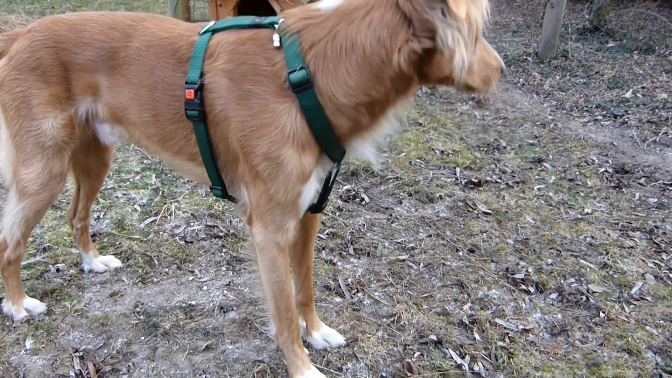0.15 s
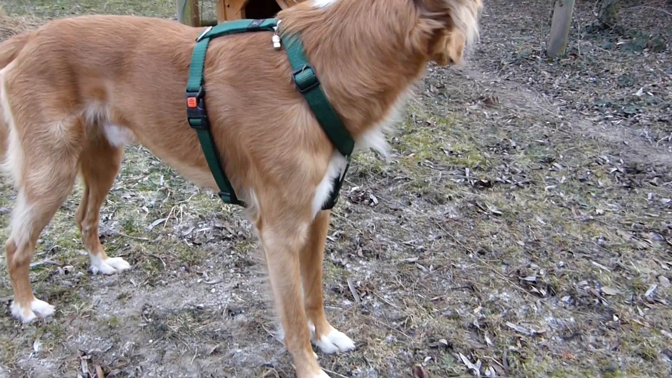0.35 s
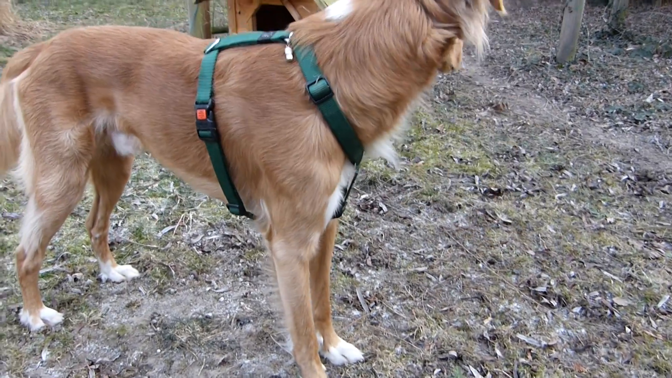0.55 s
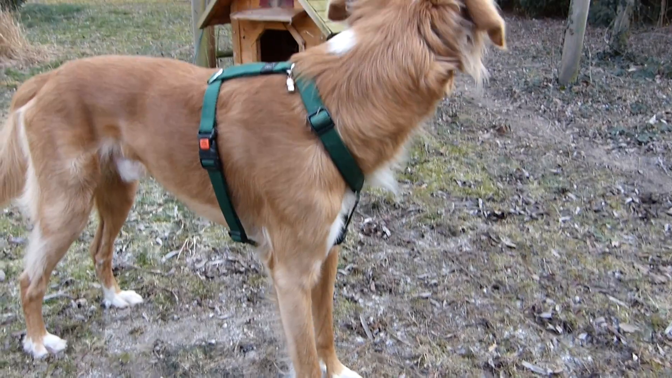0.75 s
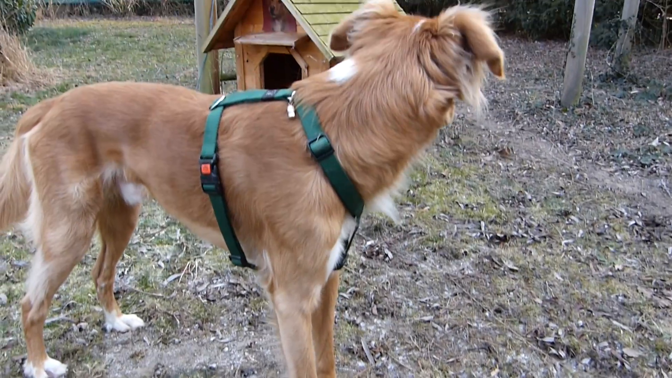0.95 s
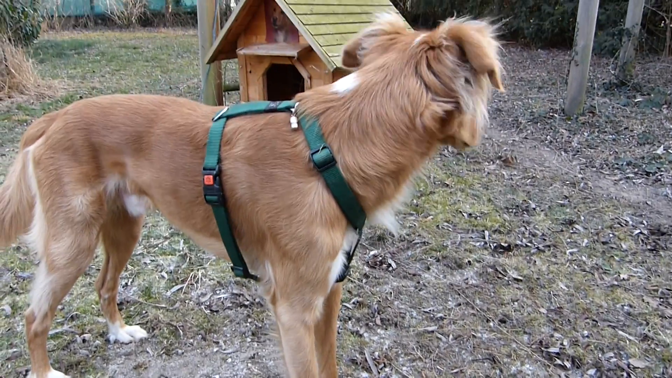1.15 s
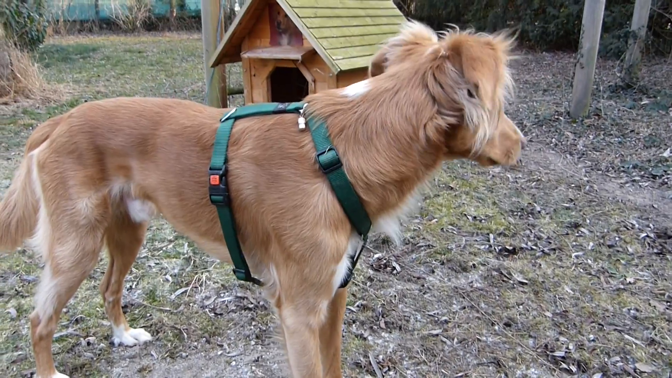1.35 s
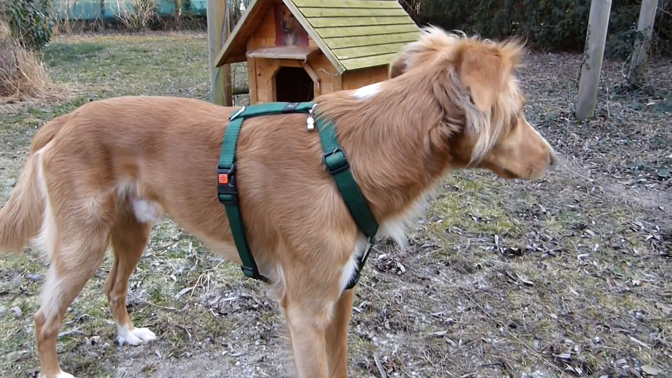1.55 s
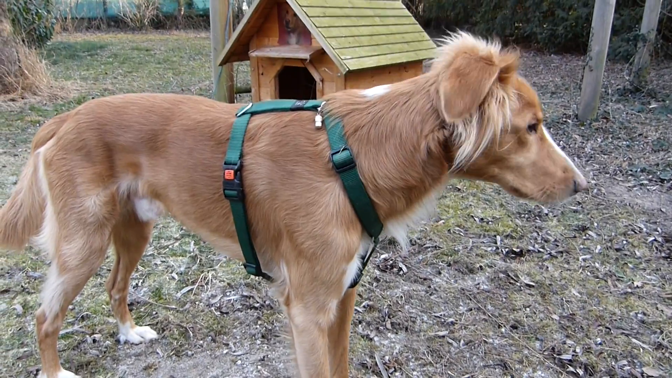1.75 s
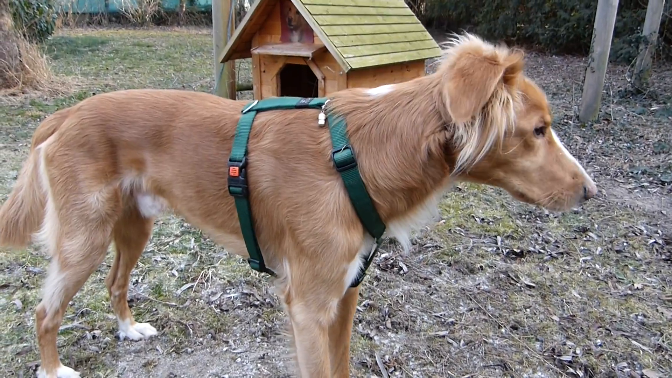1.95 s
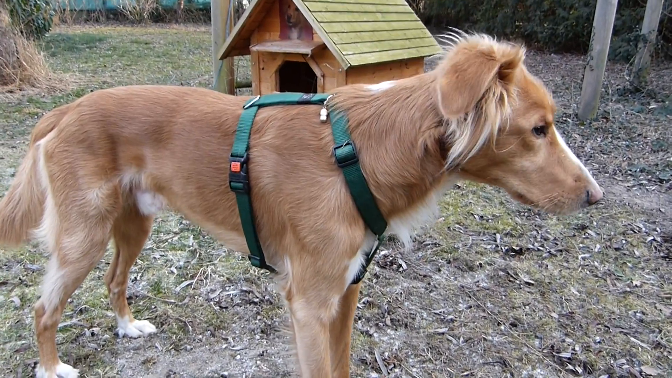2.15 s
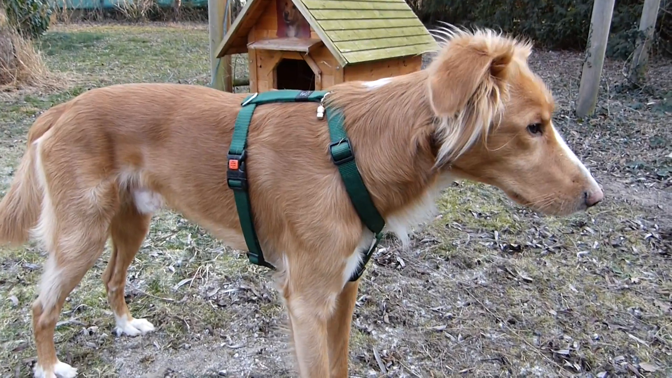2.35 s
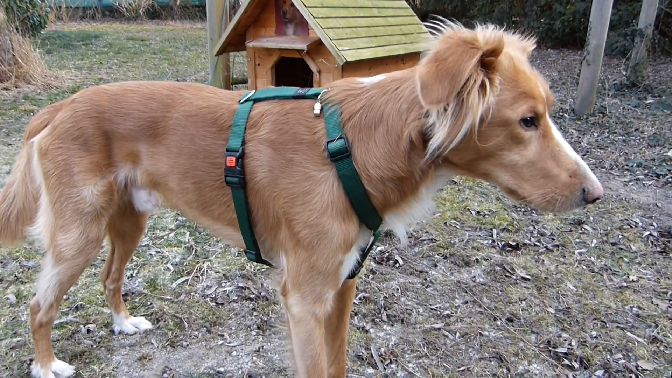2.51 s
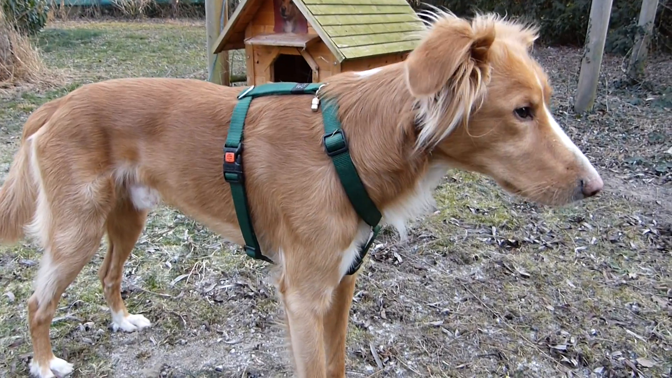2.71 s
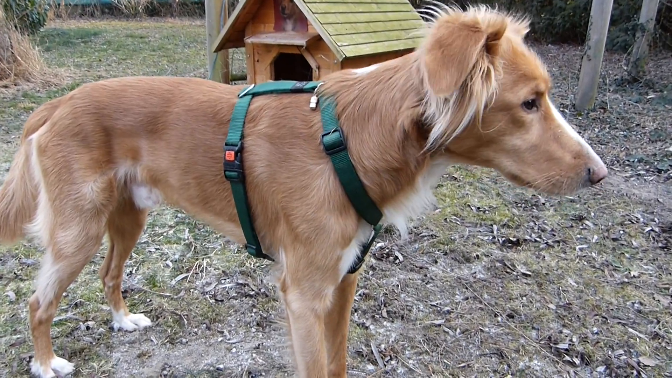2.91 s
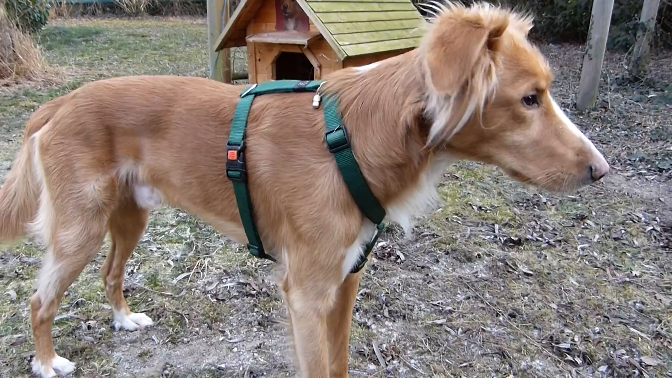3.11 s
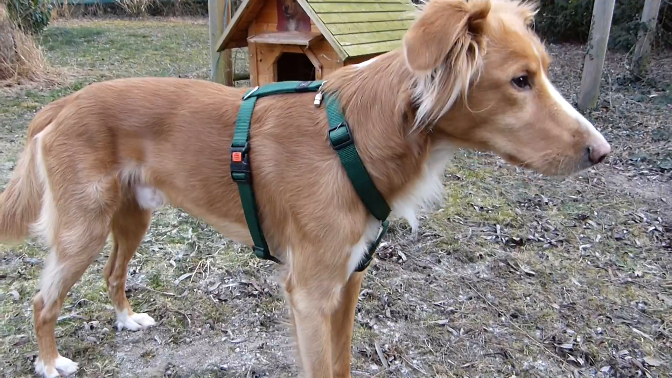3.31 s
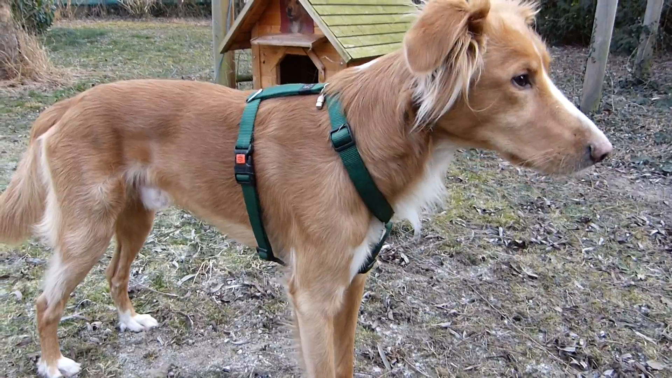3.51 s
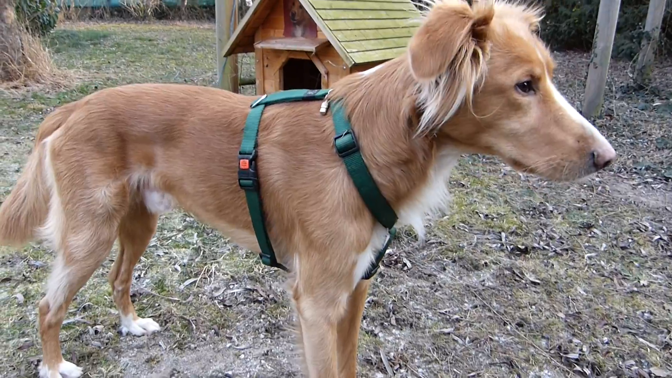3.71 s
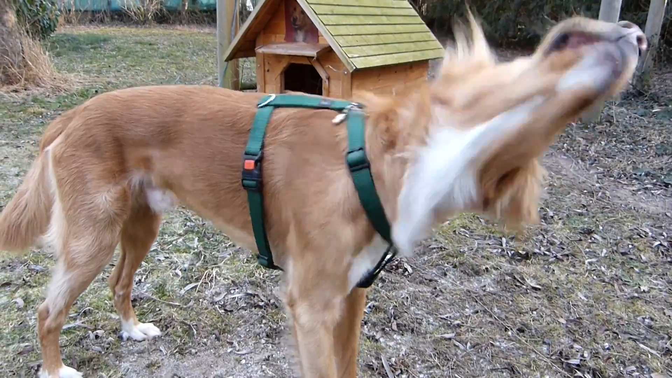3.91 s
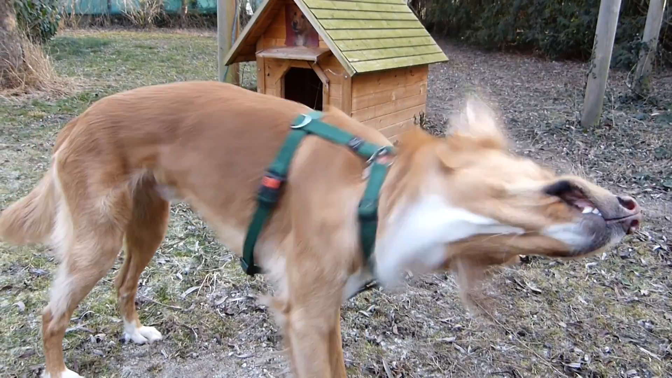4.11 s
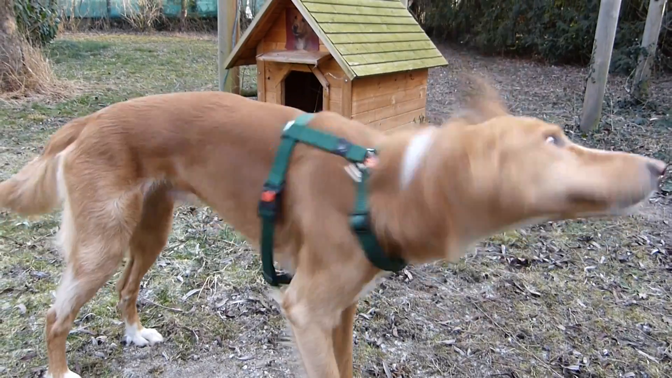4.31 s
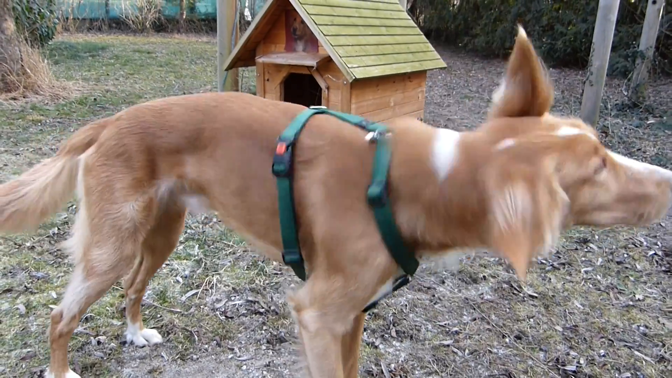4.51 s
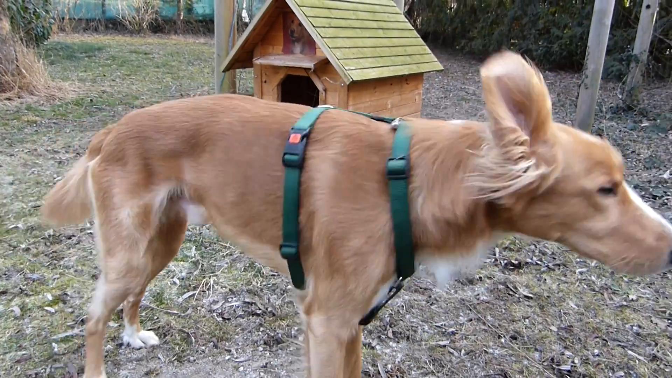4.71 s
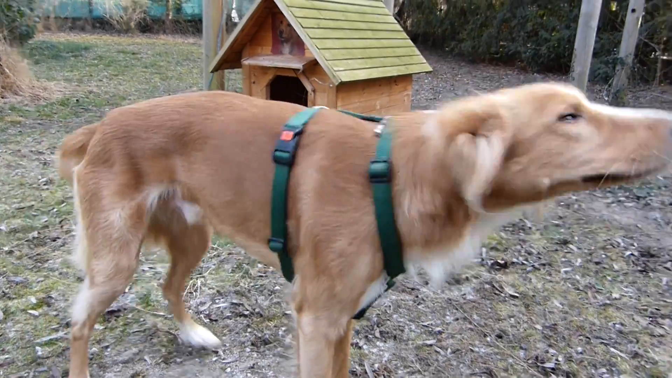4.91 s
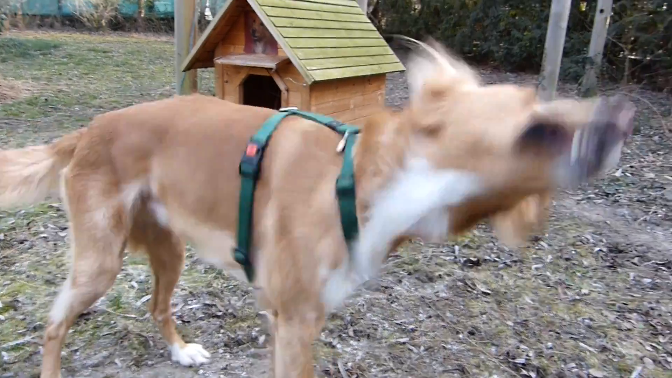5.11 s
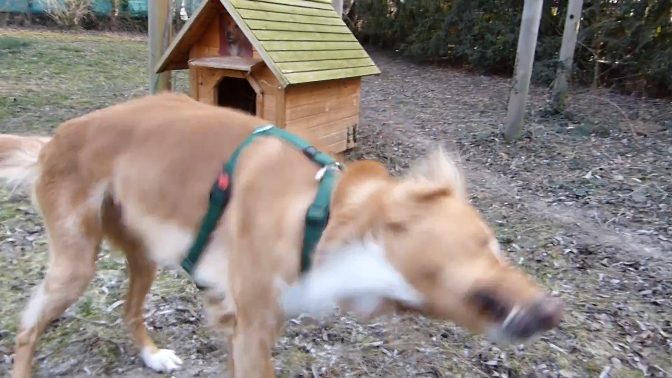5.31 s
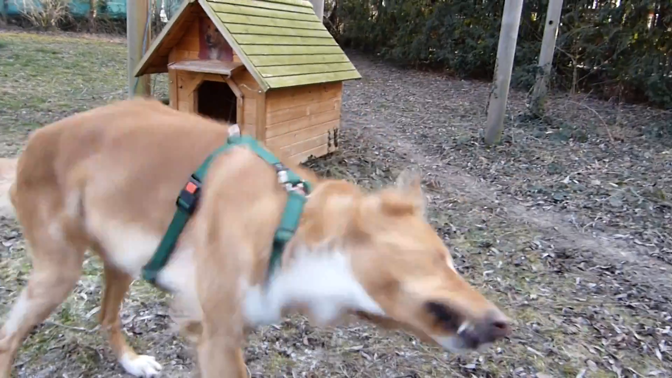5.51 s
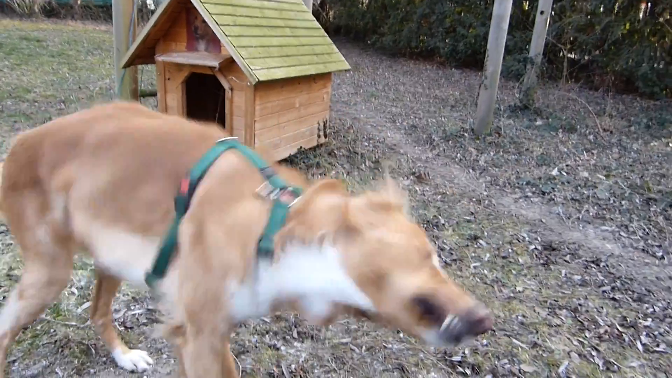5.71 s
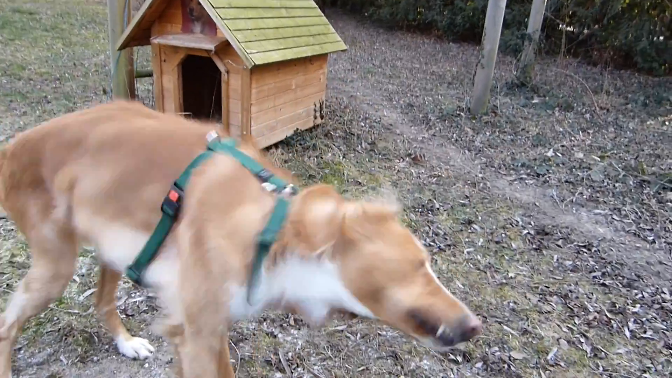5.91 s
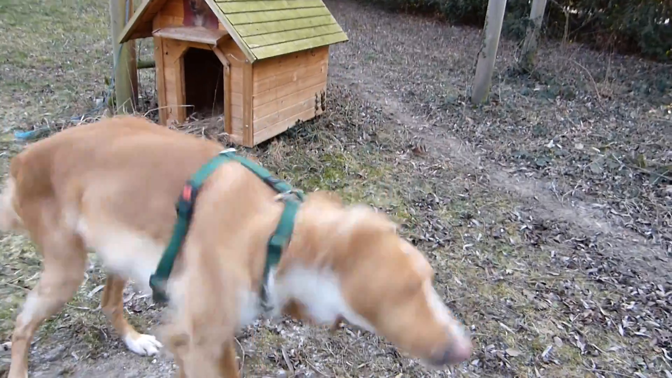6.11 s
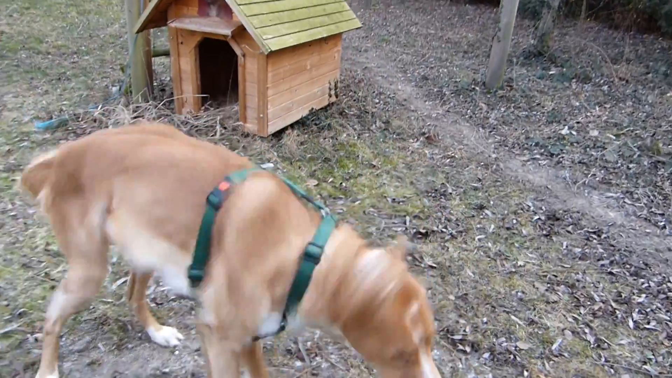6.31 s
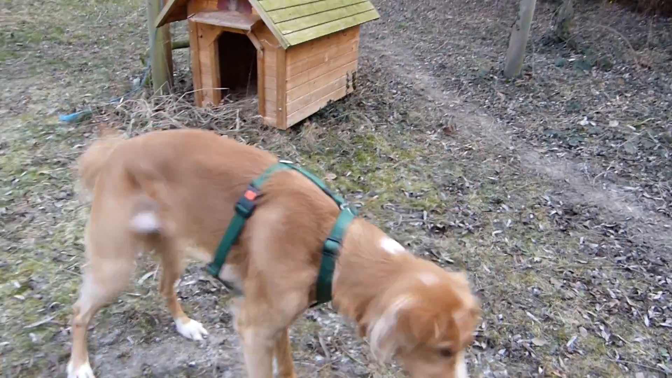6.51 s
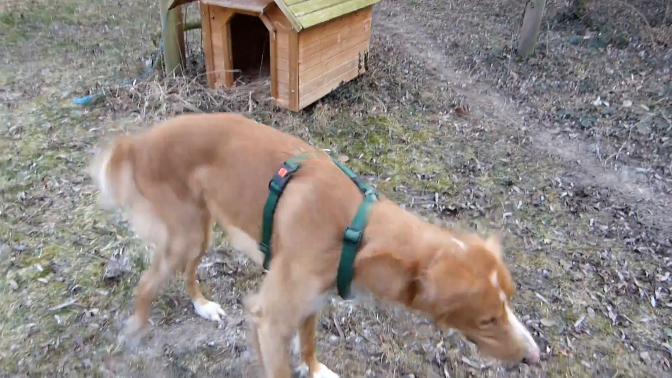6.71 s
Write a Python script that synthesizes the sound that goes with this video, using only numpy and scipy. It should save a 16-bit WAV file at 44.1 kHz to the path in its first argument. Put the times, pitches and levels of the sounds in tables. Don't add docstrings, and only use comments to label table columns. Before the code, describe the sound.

Quiet leaf scuffs and distant traffic, then a close dog's head and body shake with flapping ears, clinking harness metal and snapping twigs.

```python
import sys
import numpy as np
from scipy import signal
from scipy.fft import rfft, irfft, next_fast_len
from scipy.io import wavfile
from scipy.ndimage import uniform_filter1d

SR = 44100
rng = np.random.default_rng(int(sys.argv[2]) if len(sys.argv) > 2 else 0)


def makeup_ratio(level_db):
    decades = np.asarray(level_db, float) / 20
    return 10 ** decades


def persist_wave(psi):
    counts = np.round(np.clip(psi, -1, 1) * 32767).astype(np.int16)
    wavfile.write(sys.argv[1], SR, np.atleast_2d(counts).T)


N = 297807

# frequency in Hz, density in dB per Hz.
AIR_SPECTRUM = [(15, -39), (25, -21), (60, -12.5), (208, -3), (304, -5), (422, 1.5), (538, -0.5), (787, 4),
                (1510, -2.5), (3510, -16.5), (4130, -11.5), (7920, -13), (11000, -22), (13000, -26),
                (15600, -27), (16500, -36)]
# time in seconds, level in dB.
AIR_SWELL = [(0, 4), (2.2, 2.5), (2.6, 1), (3.4, 1.5), (3.8, 3.5), (6.75, -0.5)]
# frequency in Hz, correlation from -1 to 1.
AIR_SAME = [(60, 0.71), (150, 0.65), (380, -0.49), (950, 0.069), (2380, 0.019), (5980, 0.7), (15000, 0.37)]
# start, loudest and end in seconds, hiss in dB, brightest frequency in Hz.
SCUFFS = [(0.206, 0.273, .36, -51, 2600), (0.62, 0.84, .93, -50.5, 7400), (0.926, 0.968, 1.05, -47, 1890),
          (1.07, 1.07, 1.1, -55, 4520), (1.23, 1.276, 1.3, -56.5, 5500), (1.311, 1.333, 1.362, -44.5, 3720),
          (1.513, 1.52, 1.55, -58, 2530), (1.592, 1.7, 1.79, -45, 6850), (1.824, 1.852, 1.91, -44, 2900),
          (1.897, 1.937, 1.97, -56.5, 6000), (2.028, 2.079, 2.15, -43.5, 5100),
          (2.124, 2.177, 2.225, -45.5, 5400), (3.45, 3.56, 3.68, -61.5, 6500)]
# frequency in Hz, density in dB per Hz.
LEAF_SPECTRUM = [(180, -11), (300, -8.5), (392, -43), (462, -18), (584, -28), (762, -4), (1360, -14.5),
                 (1530, -23), (1840, -13), (3890, -14), (7080, -11), (9000, -20), (16000, -46.5)]
# frequency in Hz, correlation.
LEAF_SAME = [(200, 0.51), (700, 0.62), (2000, 0.21), (5000, 0.23), (15000, 0.13)]
# start, loudest and end in seconds, level in dB.
DRAGS = [(.215, .275, 0.32, -40.5), (.65, .8, 0.93, -46.5), (0.867, 0.894, 0.9, -41),
         (0.926, 1.005, 1.037, -37.5), (1.06, 1.073, 1.1, -48), (1.232, 1.275, 1.27, -43),
         (1.311, 1.326, 1.38, -37.5), (1.4, 1.433, 1.46, -49), (1.516, 1.526, 1.57, -48),
         (1.587, 1.67, 1.79, -39), (1.807, 1.857, 1.93, -39), (1.91, 1.946, 1.97, -51),
         (2.03, 2.083, 2.07, -40), (2.13, 2.195, 2.29, -42), (3.15, 3.2, 3.2, -55), (3.45, 3.57, 3.7, -56),
         (3.8, 3.93, 5.6, -58)]
# frequency in Hz, density in dB per Hz.
DRAG_SPECTRUM = [(60, -40), (100, -34), (250, 3), (560, 7.5), (790, -8), (1100, 4), (1600, -29),
                 (3000, -52)]
# start in
# seconds, tick in dB, struck ring in dB, jostled rings in dB, letters of the ring struck and then those
CLACKS = [(1.0659, -53, -45, -57, "abc"), (2.1862, -49, -43, -39, "bc"), (3.8918, -51.5, -41, -48, "ab"),
          (3.9953, -56, -43, -47, "cdb"), (4.055, -41, -48, -50, "ba"), (4.1146, -45, -25, -47, "cba"),
          (4.1346, -44, -16.5, -39, "dac"), (4.4938, -47, -23, -28, "ad"), (4.577, -52, -33, -37, "cd"),
          (4.824, -53.5, -46, -55, "bda"), (4.903, -55, -56, -60, "ab"), (5.1964, -46, -43, -43, "bc"),
          (5.2807, -50, -25, -46, "bac"), (5.392, -36, -14, -24, "cda"), (5.5451, -45, -19, -36, "cd"),
          (5.5781, -38, -13, -32, "da"), (5.6102, -29, -24, -27, "bac"), (5.6427, -38, -13, -20, "cda"),
          (5.7143, -55, -21, -22, "cd"), (5.7269, -23.5, -5, -13, "db"), (5.726, -41, -9, -15, "bd"),
               (5.7675, -43, -19, -20, "cd"), (5.847, -59, -23, -23, "ad"), (6.002, -48, 0.5, -22, "cda"),
               (6.021, -38, -17, -30, "abc"), (6.205, -47, -31, -35, "adc"),
               (6.2282, -43, -15.5, -18, "dc"), (6.3485, -36, -11.5, -22, "adc"),
               (6.402, -42, -11, -32, "cabd"), (6.408, -44, -21, -34, "dab")]
# start in seconds, tick in dB, struck ring in
# dB, jostled rings in dB, letters of the ring struck and then those jostled.
KNOCKS = [(4.1668, -46, -18, -25, "cda"), (4.203, -48, -32, -36, "dc"), (4.2115, -50, -26, -27, "dc"),
          (4.217, -52, -27, -32, "ad"), (4.2324, -56, -26, -38, "ad"), (4.398, -55, -35, -46, "cd"),
          (4.414, -55, -37, -36, "ca"), (4.434, -46, -27, -21, "adc"), (4.446, -53, -35, -31, "adc"),
          (4.464, -59, -35, -50, "ad"), (4.4297, -56, -22, -24, "cda"), (4.451, -47, -26, -36, "adc"),
          (5.162, -49, -39, -45, "ac"), (5.171, -55, -34, -30, "ac"), (5.209, -55, -37, -39, "ac"),
          (5.229, -59, -34, -34, "ca"), (5.265, -45, -31, -33, "dab"), (5.276, -55, -30, -49, "bc"),
          (5.4868, -42, -25, -27, "cd"), (5.5661, -51, -23, -23, "acd"), (5.5724, -26, -11.5, -15.5, "adc"),
          (5.5893, -30, -8.5, -18, "ad"), (5.5956, -35, -16, -26, "dac"), (5.6008, -33, -7.5, -13, "bc"),
          (5.606, -39, -13, -18, "bcd"), (5.622, -57, -16.5, -25, "da"), (5.6533, -36.5, -18, -20, "cd"),
          (5.664, -43, -24, -46, "dc"),
          (5.798, -50, -29, -45, "ac"), (5.8054, -36, -13, -17.5, "cda"),
               (5.8118, -30, -12.5, -28, "bac"), (5.866, -42, -22.5, -30, "dab"),
               (5.8853, -55, -26, -25, "dc"), (5.903, -49, -21, -35, "dc"), (5.9706, -44, -31, -33, "ac"),
               (5.9865, -45, -27, -23, "dca"), (5.9904, -50, -7, -14.5, "acd"),
               (6.0058, -37, -13, -12.5, "bacd"), (6.1732, -36, -25, -21, "ad"),
               (6.179, -46, -18, -29, "da"), (6.1965, -26.5, -7.5, -16, "bca"),
               (6.2011, -40, -19.5, -24, "abd"), (6.2136, -50, -25, -24, "da"),
               (6.3805, -40, -24, -49, "ab"), (6.387, -27.5, -8.5, -14, "bdc"),
               (6.3915, -37, -25, -19, "abc")]
# frequency in Hz, 60 dB decay in seconds, relative spread of pitch between
# knocks, second mode in Hz, second mode level in dB.
RINGS = [(4085, .055, .006, 7520, -14), (6540, .045, .011, 5250, -16), (8420, .034, .007, 9200, -17),
         (10000, .04, .006, 14950, -21)]
RING_LEAD = [-0.068, -0.2, 0.53, 0.52]
# frequency in Hz, level in dB.
TICK_SPECTRUM = [(1200, -16), (2500, -10), (4000, 0.5), (6000, 4), (8500, 0.5), (11000, -8), (13000, -21),
                 (16500, -77)]
# centre in seconds, level in dB, frequency in Hz.
SPIKES = [(4.144, -22, 2500), (4.1464, -8, 4900), (4.148, -8.5, 2000), (4.1474, -10.5, 2600),
          (4.15, -9.5, 2500), (5.937, -26, 3440), (5.9388, -20, 4000), (6.129, -10.5, 2720),
          (5.7384, -17, 1970), (2.187, -25.5, 4500), (5.9716, -26, 6000), (4.385, -36, 3500),
          (4.4527, -22, 6000), (5.1975, -32, 6000), (5.3431, -15.5, 3600), (5.3453, -8.5, 4550),
          (5.4379, -18.5, 4500), (5.5366, -26, 5000), (5.5387, -15, 3000), (5.5401, -20, 1800),
          (5.5727, -9, 7000), (5.6008, -7, 7960), (5.6112, -22, 3000), (5.737, -25, 4000),
          (5.8357, -20, 5000), (6.0009, -17.5, 2520), (6.0075, -10, 8450), (6.0086, -13, 7000),
          (6.1947, -9, 8500), (6.1998, -7, 8400), (6.319, -6.5, 2400), (6.3462, -24, 8000),
          (6.3874, -4, 8600), (6.3893, -25, 8000), (6.39, -16, 8500), (6.416, -13, 8800)]
# centre in seconds, level in dB.
TICKS = [(3.937, -52), (3.9789, -44), (4.0188, -30), (4.0324, -34), (4.0526, -35), (4.135, -20),
         (4.2274, -31), (4.316, -33), (4.4139, -30), (4.5214, -38), (4.675, -29.5), (4.7431, -40),
         (4.7702, -40), (4.7834, -41), (4.8354, -48), (5.0444, -40), (5.0665, -34), (5.0758, -31),
         (5.082, -25), (5.0854, -36), (5.0914, -39), (5.1074, -43), (5.1164, -41), (5.18, -32),
         (5.2044, -39), (5.232, -30), (5.3864, -28), (5.7024, -21), (5.7734, -35), (5.8424, -25),
         (5.9014, -26), (5.9045, -34), (5.9104, -30), (6.1618, -27), (6.4927, -25), (6.6624, -20),
         (6.7254, -37)]
# frequency in Hz, density in dB per Hz.
COAT_SPECTRUM = [(47, -41), (80, 4.5), (178, -0.5), (441, 0), (802, 5.5), (1340, 3.5), (3170, -10.5),
                 (4050, -6), (6740, -5), (8700, -5.5), (10300, -11.5), (11500, -16), (16000, -30)]
# frequency in Hz, correlation.
COAT_SAME = [(60, 1), (180, 0.89), (550, 0.37), (1650, 0.75), (4970, 0.86), (15000, 0.74)]
# time in seconds, swish level in dB.
HEAD_SHAKE = [(3.7, -81), (3.98, -60.5), (4.05, -48), (4.45, -56), (4.83, -57.5), (4.87, -64), (5.03, -66)]
# time in seconds, swish level in dB.
BODY_SHAKE = [(5.13, -51.5), (5.2, -50), (5.45, -44.5), (5.8, -44.5), (6.1, -44.5), (6.3, -45.5),
              (6.45, -49), (6.6, -46), (6.75, -43.5)]
# start, loudest and end in seconds, level in dB.
RATTLES = [(3.99, 4.03, 4.05, -46), (4.198, 4.21, 4.252, -42), (4.424, 4.44, 4.468, -40),
           (5.068, 5.076, 5.1, -44), (4.3, 4.318, 4.43, -54.5), (4.395, 4.402, 4.54, -52),
           (4.644, 4.66, 4.87, -56), (5.133, 5.197, 5.26, -48.5), (5.785, 5.822, 5.83, -38),
           (5.9, 5.905, 5.93, -41), (5.262, 5.268, 5.29, -45), (6.156, 6.168, 6.18, -41),
           (6.38, 6.4, 6.48, -43), (4.238, 4.246, 4.254, -42), (5.425, 5.45, 5.458, -44),
           (5.535, 5.545, 5.55, -40), (6.499, 6.507, 6.515, -42), (6.622, 6.632, 6.634, -40)]
# time in seconds, snap in dB, snap in Hz, thump in Hz,
# thump over the snap in dB.
SLAPS = [(4.067, -30, 1590, 450, -2.5), (4.1469, -21, 1460, 800, 9), (4.1487, -9, 1480, 790, -14),
         (4.2523, -18.5, 1410, 526, -11), (4.3896, -14, 1410, 770, -3), (4.5129, -35, 1460, 336, -8),
         (5.1572, -24, 1250, 765, -10.5), (5.2507, -26.5, 1590, 340, -8.5), (5.3453, -9.5, 1650, 1094, -8),
         (5.4388, -16, 1600, 730, -39), (5.5374, -7, 1740, 850, -16), (5.6375, -15, 1700, 666, -7.5),
         (5.7372, -6, 1620, 836, -12), (5.8371, -18, 1710, 664, -4.5), (5.934, -16, 1950, 790, -13),
         (5.9363, -9.5, 1730, 850, -10.5), (6.034, -19, 1650, 630, -14), (6.1279, -8, 1750, 720, -17),
         (6.2237, -23, 1950, 784, -13.5), (6.318, -8, 1790, 740, -13), (6.5104, -34, 1700, 850, -2.5)]
# time in seconds, level in dB, thump in Hz.
FOLDS = [(4.061, -31.5, 700), (4.1182, -35.5, 473), (4.244, -26, 950), (5.348, -34, 586), (5.351, -39, 597),
         (5.9386, -29, 610), (5.442, -29.5, 510), (5.5399, -28.5, 480), (5.6397, -27, 640),
         (5.7395, -21, 576), (6.1305, -19, 630), (6.3205, -24, 597), (6.3247, -34.5, 490),
         (6.4147, -28, 760)]
# time in seconds, level in dB, snap in Hz.
SMACKS = [(4.156, -29, 2580), (5.193, -51, 2200), (5.223, -45, 1300), (5.307, -40.5, 1490),
          (5.335, -31, 900), (5.3545, -33, 1810), (6.38, -36, 2000), (4.1605, -24, 1590),
          (4.766, -37, 1410), (5.393, -24.5, 3020), (5.4248, -28, 1900), (5.61, -22, 1960),
          (5.612, -21.5, 1390), (6.0015, -15, 1730), (6.2484, -29, 1230), (6.6336, -31.5, 1780)]
# time in seconds, left over right in dB.
HEAD_PAN = [(4.1, -6.5), (5.4, -3.5), (5.8, -1.5), (6.4, -2.5)]
# time in seconds, level in dB, frequency in Hz.
STEPS = [(4.066, -41, 250), (4.148, -42, 262), (4.391, -33.5, 296), (5.739, -42, 360), (6.129, -30, 380),
         (4.253, -39.5, 302), (5.25, -38, 330), (5.347, -21.5, 362), (5.441, -37.5, 196), (5.54, -30, 382),
         (5.935, -22, 418), (6.036, -41, 166), (6.3195, -28, 353), (6.493, -56, 152), (6.524, -41, 202.9),
         (6.596, -39, 182), (6.655, -51, 140), (6.722, -38, 227), (6.728, -39, 325), (6.742, -46, 148)]
# start in seconds, level in dB, frequency in Hz, 60 dB decay in seconds.
TWIGS = [(6.4746, -26, 7350, .006), (6.5054, -17, 6760, 0.0022), (6.5087, -27, 9350, 0.0069),
         (6.5599, -8, 7640, 0.0034), (6.5592, -14.5, 5500, 0.0062), (6.5578, -17, 8600, 0.0045),
         (6.559, -23, 4240, 0.012), (6.633, -5, 9000, 0.0088), (6.6352, -21, 5140, 0.0061),
         (6.634, -29, 4080, 0.02), (6.6374, -30, 9200, 0.014), (6.64, -17, 5930, 0.0032),
         (6.6435, -26, 7400, 0.0087), (6.6927, -19.5, 5860, 0.0053), (6.694, -21.5, 7500, 0.0063),
         (6.695, -27, 6000, 0.0072), (6.694, -26, 12500, .006)]


def evened(x):
    return x / np.sqrt(np.mean(x ** 2) + 1e-20)


def read(points, hz):
    f, value = np.transpose(points)
    return np.interp(np.log(hz + 1), np.log(f + 1), value)


def add(mix, s, sound):
    part = mix[..., round(s * SR):][..., :sound.shape[-1]]
    part += sound[..., :part.shape[-1]]


def follow(rows, column):
    rows = np.array(rows, float)
    return np.interp(np.arange(N) / SR, rows[:, 0], rows[:, column])


def stroke(start, top, end):
    return follow([(start, 0), (top, 1), (end, 0)], 1) ** 0.62


def passed(x, hz, kind, order):
    return signal.sosfilt(signal.butter(order, hz, kind, fs=SR, output="sos"), x)


def sides(db):
    return makeup_ratio(np.array([[.5], [-.5]]) * db)


def pulse(t, rise_s, fall_s, power):
    return np.exp(-np.where(t < 0, (t / rise_s) ** 2, abs(t / fall_s) ** power))


def noise(colour, same, patchy_db, size, lag_s=0):
    split_hz = 2330
    hop = size // 4
    frames, hz = N // hop + 5, np.fft.rfftfreq(size, 1 / SR)
    draws = rng.standard_normal((5, frames, len(hz)), np.float32)
    a, b, c, d, patches = draws.transpose(0, 2, 1)
    patches = evened(uniform_filter1d(uniform_filter1d(patches, size // 64, 0), 12, 1))
    like = np.clip(read(same, hz), -1, 1)[:, None]
    left = a + 1j * b
    right = like * left + np.sqrt(1 - like ** 2) * (c + 1j * d)
    z = np.array([left, right])
    z[0] *= np.exp(-2j * np.pi * hz * lag_s)[:, None]
    z *= makeup_ratio(read(colour, hz)[:, None] + patchy_db * patches)
    whole = signal.istft(z, nperseg=size, noverlap=size - hop)[1][:, :N]
    long = next_fast_len(N)
    low_gain = 1 / (1 + (np.fft.rfftfreq(long, 1 / SR) / split_hz) ** 6)
    low = irfft(rfft(whole, long) * low_gain, long)[:, :N]
    return low, whole - low


def grain(per_s, spread_db, ms, bed):
    biggest = 2.6
    size = makeup_ratio(spread_db * np.minimum(rng.exponential(1, N), biggest))
    size = size * (rng.random(N) < per_s / SR)
    jumps = signal.lfilter([1], [1, -np.exp(-1000 / (ms * SR))], size)
    return evened(bed + evened(jumps))


def garden():
    low, high = noise(AIR_SPECTRUM, AIR_SAME, patchy_db=1.5, size=1024)
    return makeup_ratio(-56.5 + follow(AIR_SWELL, 1)) * evened(low + high)


def leaves():
    parts = noise(LEAF_SPECTRUM, LEAF_SAME, patchy_db=1.65, size=512, lag_s=0.000368)
    low, high = (evened(v) for v in parts)
    out = np.zeros((2, N))
    for start, top, end, db, hz in SCUFFS:
        octaves = np.log2(hz / 4096)
        on = slice(round(start * SR), round(end * SR))
        bright = evened(passed((high + low)[:, on], [hz * 0.91, hz * 1.074], "bandpass", order=2))
        body = makeup_ratio(1 - octaves) * low[:, on]
        hiss = high[:, on] + makeup_ratio(-13 + 2.5 * octaves) * bright
        out[:, on] += makeup_ratio(db) * stroke(start, top, end)[on] * (hiss + body)
    crackle = grain(per_s=300, spread_db=4, ms=1.2, bed=4)
    return passed(out * crackle, 560, "highpass", order=2)


def drags():
    leak_db = -22.5
    low = evened(sum(noise(DRAG_SPECTRUM, [(50, 0.0041), (5000, 0)], patchy_db=2.0, size=512)))
    level = sum(makeup_ratio(db) * stroke(a, top, b) for a, top, b, db in DRAGS)
    return level * (np.array([[1], [-1]]) * low[0] + makeup_ratio(leak_db) * low[1])


def ring_levels(struck_db, jostled_db, names):
    pass_db, idle_db = -2.5, -28
    levels = dict.fromkeys("abcd", jostled_db + idle_db)
    levels.update({name: jostled_db + pass_db * k for k, name in enumerate(names[1:])})
    levels[names[0]] = struck_db
    return np.array(list(levels.values()))


def jolts():
    lead_s, tick_db, ring_db, jostle_db, growth = 0.00065, -21.5, -6, -26, 1.5
    hard = [(s, growth * (db + 9) - 12.5) for s, db, *_ in SLAPS]
    return [(s - lead_s, db + tick_db, db + ring_db, db + jostle_db, "abc") for s, db in hard]


def harness(rows, ring_share, rough, rise_s, choke):
    damp_spread_db = 1.5
    soft_rise_db = -0.13
    out, t = np.zeros((2, N)), np.arange(2600) / SR
    luck = rng.standard_normal((len(rows), len(RINGS), 4))
    fizz = rng.standard_normal((len(rows), 512))
    rubs = rng.standard_normal((len(rows), 8, len(t)))
    shiver = evened(uniform_filter1d(uniform_filter1d(rubs, 70), 40))
    hz, t60, spread, over_hz, over_db = np.transpose(RINGS)[..., None]
    lead = np.multiply.outer([.5, -.5], RING_LEAD)[..., None]
    colour = makeup_ratio(read(TICK_SPECTRUM, np.fft.rfftfreq(512, 1 / SR)))
    tick_t = t[:512]
    tick_fall = np.exp(-tick_t / 0.0018) + 0.8 * np.exp(-tick_t / 0.000087)
    tick_shape = tick_fall * (1 - np.exp(-tick_t / 0.00022))
    for (s, tick_db, *struck), chance, puff, rub in zip(rows, luck, fizz, shiver):
        tune, damp, phase, lean = chance.T[..., None]
        ring_s = ring_share * t60 * makeup_ratio(damp_spread_db * damp)
        swell_s = rise_s * makeup_ratio(soft_rise_db * max(-12 - struck[0], 0))
        decay = makeup_ratio(-60 * (t / ring_s) ** choke) * (1 - np.exp(-t / swell_s))
        turn = 2 * np.pi * t * (1 + spread * tune)
        tones = (1 + rough * rub[:4]) * np.sin(hz * turn + phase + lead)
        tones = tones + makeup_ratio(over_db) * rub[4:] * np.sin(over_hz * turn)
        knock = (makeup_ratio(ring_levels(*struck)[:, None] - 5.0) * decay * tones).sum(1)
        knock[:, :512] += makeup_ratio(tick_db + 9.5) * evened(irfft(rfft(puff) * colour)) * tick_shape
        add(out, s, knock * sides(-0.6 + 1.5 * lean[0]))
    return out


def ground(x):
    taps = np.zeros((2, 6000))
    at = np.arange(120, 5980, 20) + rng.integers(0, 20, (2, 293))
    np.put_along_axis(taps, at, rng.choice([-1., 1.], at.shape), 1)
    taps *= makeup_ratio(-60 * np.arange(6000) / SR / 0.082)
    return signal.oaconvolve(x, taps / np.linalg.norm(taps[0]), axes=1)[:, :N]


def spikes():
    out, t = np.zeros((2, N)), np.arange(-100, 100) / SR
    rows = [(*row, 0.59) for row in SPIKES] + [(s, db - 5.5, 9000, 3) for s, db in TICKS]
    for s, db, hz, cycles in rows:
        click = np.exp(-(t * hz / cycles) ** 2) * np.cos(2 * np.pi * hz * t)
        add(out, s + t[0], makeup_ratio(db) * click)
    return out * sides(-1.2)


def ring_chatter():
    chatter, t = np.zeros(N), np.arange(1500) / SR
    for (hz, t60, *_), db in zip(RINGS * 3, (0, -12, -2, -3) * 3):
        taps, luck = np.zeros(N), rng.random((N * 60 // SR, 2))
        taps[(luck[:, 0] * N).astype(int)] = makeup_ratio(9.9 * np.minimum(-np.log(luck[:, 1]), 3))
        shift = 1 + .02 * rng.uniform(-1, 1)
        ring = makeup_ratio(-60 * t / (0.3 * t60)) * np.sin(2 * np.pi * hz * shift * t)
        chatter += makeup_ratio(db) * evened(signal.oaconvolve(taps, ring)[:N])
    return chatter


def coat():
    swing_hz, swing_peak_s, swing_db = 4.93, 10, 0.5
    hush_db, hush_s = -1, 0.036
    flap_db, flap_share = -50, 0.69
    low, high = noise(COAT_SPECTRUM, COAT_SAME, patchy_db=3, size=512)
    scale = np.sqrt(np.mean(high ** 2))
    brushing = uniform_filter1d(grain(per_s=250, spread_db=6, ms=1.0, bed=2.7), size=12)
    swish = high / scale * brushing
    time = np.arange(N) / SR
    swing = np.cos(2 * np.pi * swing_hz * (time - swing_peak_s))
    since = time - np.array(SLAPS)[:, :1]
    hush = np.minimum((np.exp(-abs(since) / hush_s) * (since > 0)).sum(0), 1)
    effort_db = follow(HEAD_SHAKE + BODY_SHAKE, 1) + swing_db * swing + hush_db * hush
    flap_level = makeup_ratio(flap_db + flap_share * (effort_db + 47.0) - effort_db)
    flapping = low / scale * flap_level * grain(per_s=100, spread_db=17.0, ms=13.0, bed=1.5)
    flapping = passed(flapping, 126, "highpass", order=2)
    chatter = ring_chatter()
    start = np.clip((time - HEAD_SHAKE[0][0]) / .15, 0, 1)
    steady = start * makeup_ratio(effort_db) * (swish + flapping + makeup_ratio(-15) * evened(chatter))
    runs = sum(makeup_ratio(db) * stroke(a, top, b) for a, top, b, db in RATTLES)
    sliding = np.roll(swish, 5000, axis=1)
    return steady + runs * evened(makeup_ratio(-11.5) * chatter + sliding)


def contacts():
    tip_lead_s, tip_db = .0021, -18

    def side(s):
        return np.interp(s, *np.transpose(HEAD_PAN))
    slaps = [(*row, side(row[0])) for row in SLAPS]
    tips = [(s - tip_lead_s, db + tip_db, *rest) for s, db, *rest in slaps]
    folds = [(s, db, 950, hz, -1, side(s)) for s, db, hz in FOLDS]
    smacks = [(s, db, hz, 0.46 * hz, -42, 3.5) for s, db, hz in SMACKS]
    return slaps + tips + folds + smacks


def ears():
    out, t = np.zeros((2, N)), np.arange(-300, 900) / SR
    rows = contacts()
    luck = rng.standard_normal((len(rows), 3, len(t)))
    flutter_band = signal.butter(2, [350, 2300], "bandpass", fs=SR)
    late = t - .0004
    lead = np.array([[1], [-1]]) * 0.072
    fade = np.exp(-np.where(t < 0, -t / 0.0025, t / 0.0032))
    for (s, db, snap_hz, thump_hz, thump_db, pan_db), (a, b, c) in zip(rows, luck):
        snap = np.cos(2 * np.pi * snap_hz * t) * pulse(t, 0.00038, 0.00091, 1.36)
        thump = np.cos(2 * np.pi * thump_hz * late + lead) * pulse(late, 0.00086, 0.003, 2.34)
        crack = np.cos(2 * np.pi * 1.8 * snap_hz * t) * np.exp(-(t / 0.000043) ** 2)
        crack_db = -13.5 + 0.15 * (db + 12)
        flutter = np.array([evened(signal.lfilter(*flutter_band, a + 0.45 * n)) for n in (b, c)]) * fade
        slap = sides(pan_db) * (snap + makeup_ratio(crack_db) * crack + makeup_ratio(-16) * flutter)
        slap = slap + sides(pan_db - 0.5) * makeup_ratio(thump_db) * thump
        add(out, s + t[0], makeup_ratio(db + 1.54) * slap)
    return out


def paws():
    out, t = np.zeros((2, N)), np.arange(-400, 1200) / SR
    for (s, db, hz), (phase, skew) in zip(STEPS, rng.standard_normal((len(STEPS), 2))):
        lead = np.array([[1], [-1]]) * (0.064 + 0.091 * skew)
        push = pulse(t, 0.57 / hz, 1.03 / hz, 1) * np.cos(2 * np.pi * hz * t + phase + lead)
        add(out, s + t[0], makeup_ratio(db) * push)
    return out


def twigs():
    rise_s, rough, hedge_db, hedge_t60_s = 0.0001, 0.31, -12.5, 0.21
    out, t = np.zeros(N), np.arange(1200) / SR
    for (s, db, hz, t60), rub in zip(TWIGS, rng.standard_normal((len(TWIGS), len(t)))):
        shiver = 1 + rough * evened(uniform_filter1d(rub, size=12))
        decay = makeup_ratio(db + 1.5 - 60 * t / t60) * (1 - np.exp(-t / rise_s))
        add(out, s, decay * shiver * np.sin(2 * np.pi * hz * t))
    lag = np.arange(12000) / SR
    hedge = rng.standard_normal((2, len(lag))) * makeup_ratio(-60 * lag / hedge_t60_s) * (lag > .002)
    scatter = signal.oaconvolve(out[None], hedge / np.linalg.norm(hedge[0]), axes=1)[:, :N]
    return out * sides(-2.4) + makeup_ratio(hedge_db) * scatter


def scene():
    dull_hz = 11600
    free = harness(KNOCKS, ring_share=1.0, rough=.4, rise_s=0.00038, choke=0.72)
    choked = harness(CLACKS + jolts(), ring_share=0.27, rough=.3, rise_s=0.00018, choke=0.89)
    edges = passed(spikes(), dull_hz, "lowpass", order=3)
    hits = passed(ears() + free + choked + edges, 157, "highpass", order=2)
    hits = hits + passed(paws(), 120, "highpass", order=3)
    dog = hits + makeup_ratio(-17.5) * ground(hits) + coat()
    snaps = passed(twigs(), dull_hz, "lowpass", order=3)
    return garden() + leaves() + drags() + dog + snaps


def low_pass(x):
    return signal.sosfilt(signal.butter(12, 17130, fs=SR, output="sos"), x)


def record(dry):
    faded = passed(dry, 16350, "lowpass", order=20)
    return low_pass(faded)


dry = scene()
out = record(dry)
persist_wave(out)
```